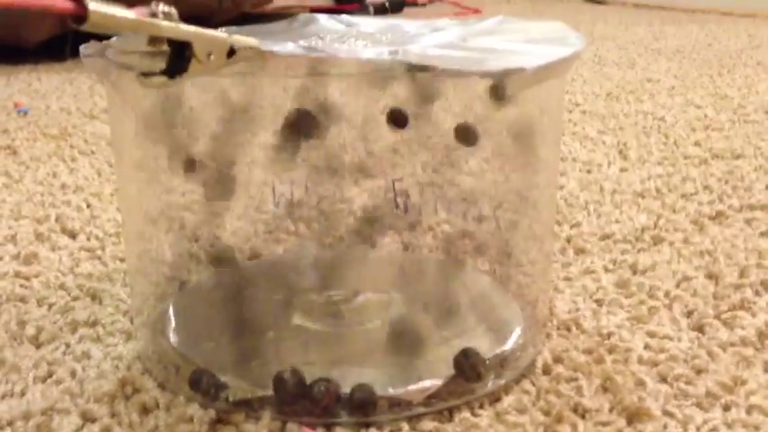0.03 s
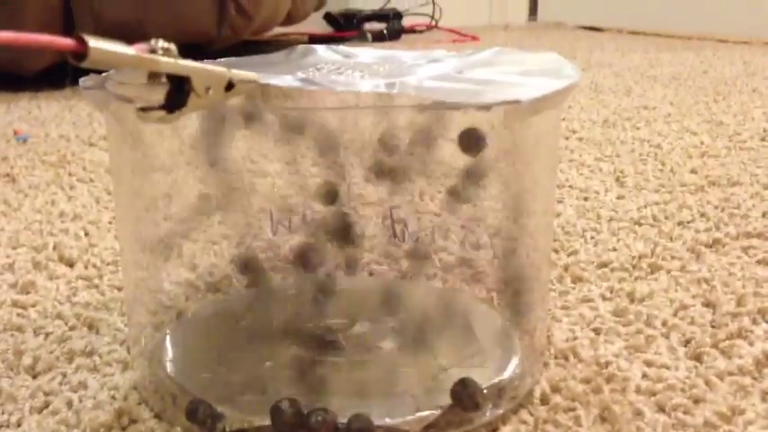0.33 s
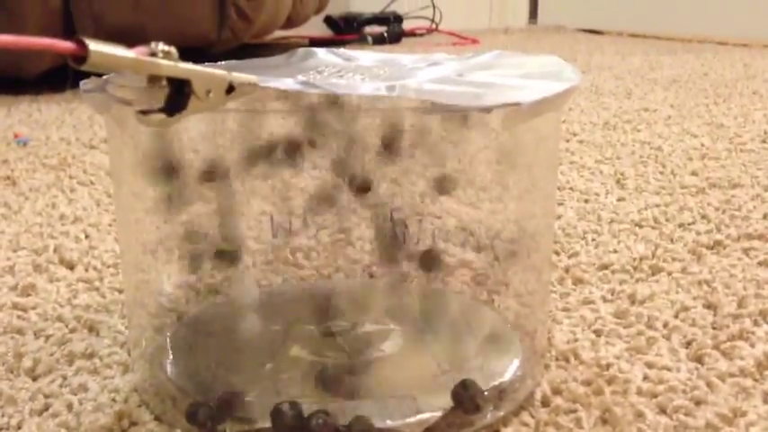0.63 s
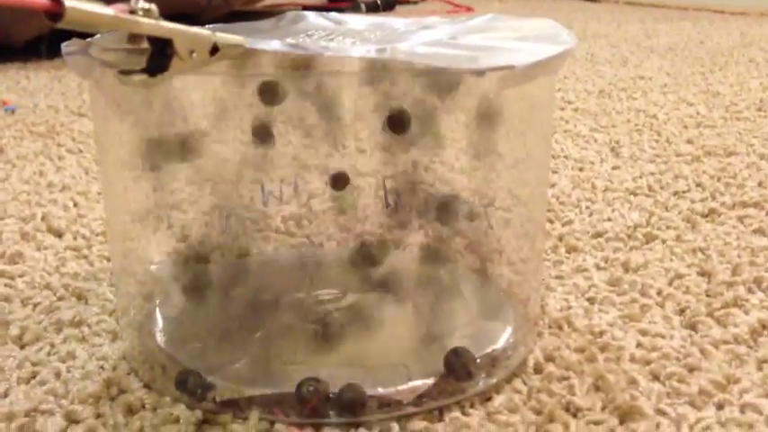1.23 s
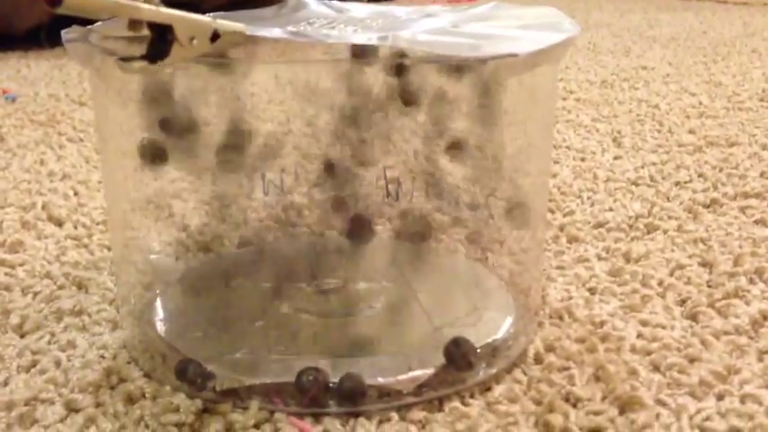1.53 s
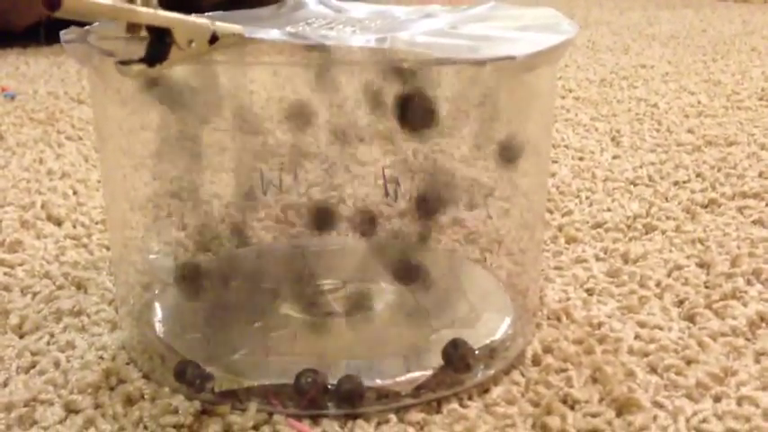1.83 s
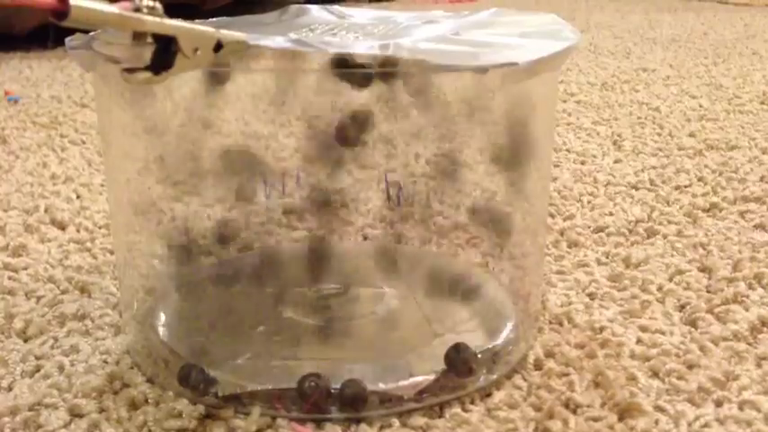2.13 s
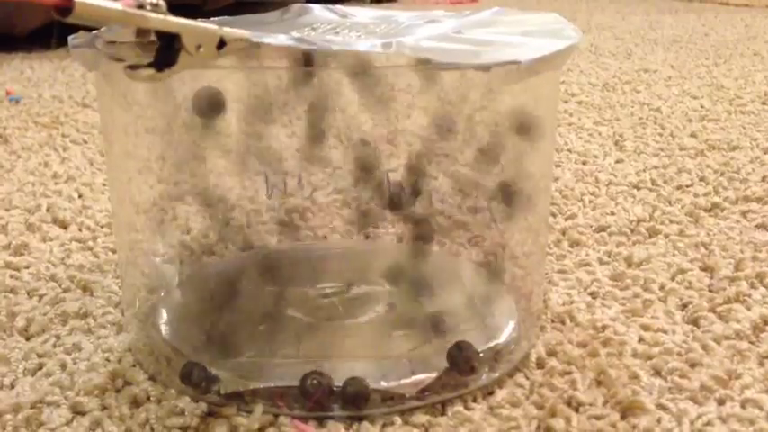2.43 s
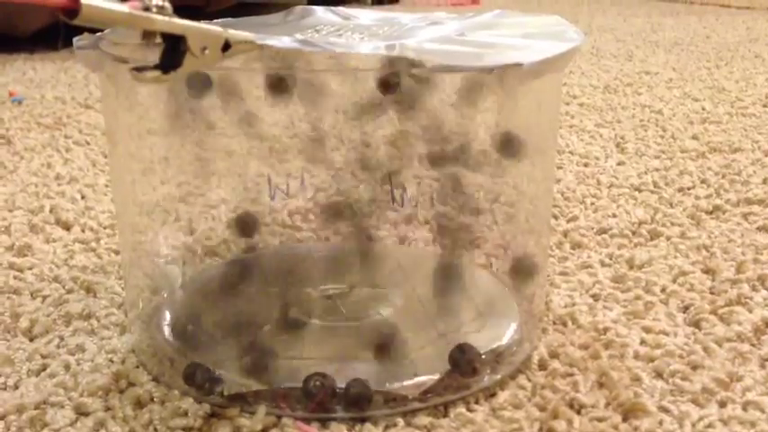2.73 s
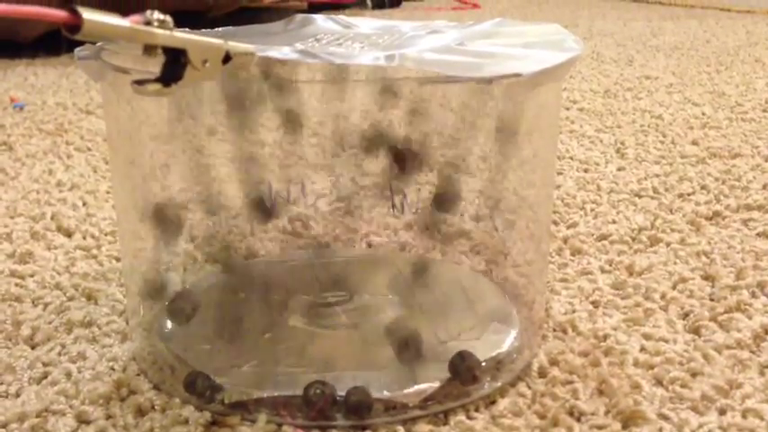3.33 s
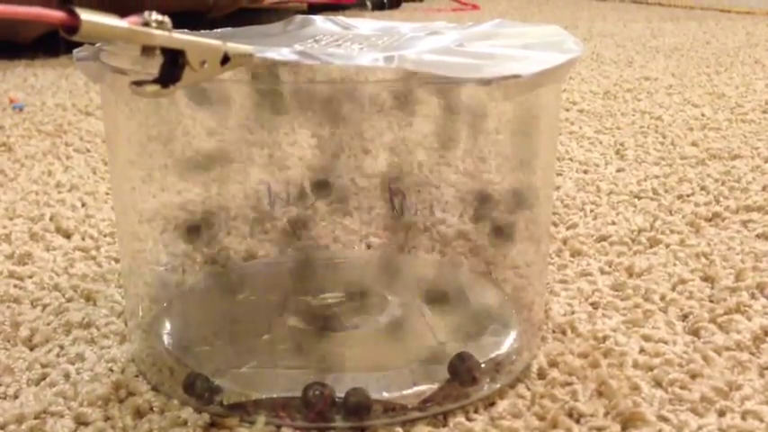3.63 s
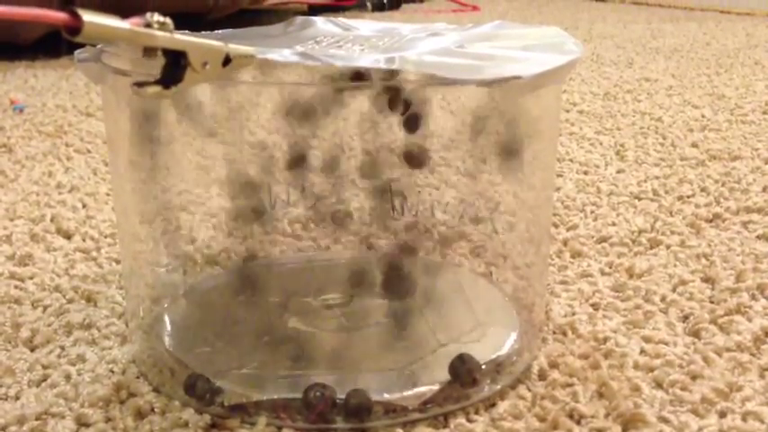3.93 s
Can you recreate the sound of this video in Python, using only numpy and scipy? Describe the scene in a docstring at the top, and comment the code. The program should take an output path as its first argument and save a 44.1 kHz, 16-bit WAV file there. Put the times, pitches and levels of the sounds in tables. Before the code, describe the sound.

Many small foam balls bounce and rattle inside a plastic tub with a foil lid.

```python
"""Dozens of small foam balls bounce between the floor and foil lid of a plastic tub standing on carpet.
Each contact drums on the tub, whose air rings near 600 Hz, rattles its shell and sets the foil crackling.
The swarm slowly loses vigour, with brief dips. A small room answers, over a faint low hum."""
import sys
import numpy as np
from scipy import signal
from scipy.fft import rfft, irfft, next_fast_len
from scipy.io import wavfile

SR = 44100
rng = np.random.default_rng(int(sys.argv[2]) if len(sys.argv) > 2 else 0)


def transcribe(u):
    """Save the signal u as a 16-bit wav file named by the first command-line argument.

    u: samples, shape (n,) or (channels, n), limited to [-1, 1]; the rate is SR.
    q: integer samples, one column per channel.
    """
    v = np.clip(np.atleast_2d(u).T, -1, 1)
    q = np.round(v * 32767).astype(np.int16)
    wavfile.write(sys.argv[1], SR, q)


N = 176400


# hardest drumming contacts: t/s, level/dB
THUMP_HITS = [(0.046, -31), (0.114, -25.5), (0.146, -32), (0.224, -41), (0.243, -28), (0.295, -28.5),
              (0.377, -27.5), (0.408, -35), (0.449, -27), (0.468, -26), (0.484, -27.5), (0.582, -29.5),
              (0.6, -30.5), (0.645, -27.5), (0.674, -28), (0.742, -28), (0.774, -26.5), (0.812, -30),
              (0.84, -31), (0.858, -32), (0.941, -32.5), (1.045, -31.5), (1.121, -29), (1.188, -31),
              (1.213, -28), (1.261, -27.5), (1.282, -30), (1.297, -27), (1.324, -32), (1.357, -27),
              (1.385, -28), (1.441, -28.5), (1.469, -26), (1.492, -32), (1.564, -31), (1.585, -29),
              (1.614, -28), (1.696, -31), (1.741, -29), (1.814, -28), (1.843, -30), (1.883, -29),
              (1.919, -28), (1.953, -32), (2.021, -30), (2.072, -26), (2.247, -32), (2.33, -34),
              (2.367, -27.5), (2.399, -23.5), (2.431, -29), (2.463, -27), (2.536, -30), (2.589, -30),
              (2.839, -31.5), (2.978, -34), (3.054, -27.5), (3.146, -29.5), (3.34, -29), (3.372, -33),
              (3.415, -29), (3.457, -29), (3.525, -33), (3.583, -29), (3.6, -28), (3.623, -26.5),
              (3.692, -26.5), (3.741, -28), (3.857, -32), (3.907, -28.5)]
# broad response of the tub: f/Hz, level/dB
DRUM_SPECTRUM = [(30, -68), (90, -49), (165, -23.5), (290, -16.5), (420, -7.5), (530, -0.5), (660, -3.5),
                 (850, -5.5), (1150, -13), (1600, -14.5), (4000, -46.5)]
# air resonances in the tub: f/Hz, width/Hz, lift/dB
CAVITY_MODES = [(241.3, 13.4, 6), (587, 57, 7.5), (734.6, 25, 9)]
def drumming(vigour, light_db=-44, thump_gain_db=14, flutter_gain_db=-21.5):
    """Contacts push on lid and floor, the lid flutters, and the air in the tub rings."""
    light = amp(light_db) * vigour * taps(rate_hz=170, spread_db=1.5)
    hits = light + amp(thump_gain_db) * pulses(THUMP_HITS)
    flutter = amp(flutter_gain_db) * crackle(hits, decay_s=0.006)
    return convolved(hits + flutter, body(DRUM_SPECTRUM, CAVITY_MODES))


def knocks(centre_hz=602, spread_oct=0.12, rise_s=0.0025, gain_db=-2.5):
    """A hard landing rings hollow, at a pitch set by where the ball meets the lid."""
    t = np.arange(SR // 20) / SR
    envelope = t / rise_s * np.exp(1 - t / rise_s)
    out = np.zeros(N + len(t))
    for (s, db), place in zip(THUMP_HITS, rng.standard_normal(len(THUMP_HITS))):
        hz = centre_hz * 2 ** (spread_oct * place)
        out[int(s * SR):][:len(t)] += amp(db + gain_db) * envelope * np.sin(2 * np.pi * hz * t)
    return out[:N]


def swell(at_s=2.759, width_s=0.0085, hz=596, peak_db=-26):
    """One brief clear note, as contacts fall in step with the tub's ring."""
    t = np.arange(N) / SR - at_s
    return amp(peak_db) * np.exp(-np.abs(t) / width_s) * np.sin(2 * np.pi * hz * t)


HARD_DECAY_S, LIGHT_DECAY_S = 0.0098, 0.0065
# hardest rattling contacts: t/s, level/dB, foil offset/dB
RATTLE_HITS = [(0.037, -33.5, -29), (0.124, -30, -3), (0.141, -30.5, -3.5), (0.242, -31.5, -4),
               (0.274, -30, -6), (0.374, -30.5, -5), (0.469, -29.5, -13), (0.517, -33.5, -7),
               (0.582, -29, -6), (0.638, -32.5, -3.5), (0.703, -29.5, -8), (0.808, -30.5, -8),
               (0.839, -29, -3.5), (0.914, -29.5, -7), (0.95, -34.5, -1.5), (0.995, -28.5, -12),
               (1.042, -30, -6), (1.136, -31.5, -1), (1.168, -33.5, -18), (1.26, -28.5, -10),
               (1.307, -30.5, -14), (1.325, -30, -10), (1.363, -35, -16), (1.385, -33, 0.5),
               (1.429, -33, -3), (1.459, -32, -3), (1.531, -31, -6), (1.56, -31.5, -0.5), (1.661, -33, -10),
               (1.696, -34, -6), (1.738, -33.5, 1.5), (1.807, -35, -10), (1.824, -32.5, -14),
               (1.874, -28.5, -9), (1.903, -33.5, -6), (1.933, -31.5, -5), (2.016, -36, -3),
               (2.065, -31, -8), (2.141, -38, -1), (2.161, -29, -9), (2.222, -31.5, -6.5),
               (2.314, -36.5, -6), (2.35, -30, -21), (2.396, -29.5, -9), (2.462, -30, -8),
               (2.588, -36, -15), (2.84, -38, -6), (2.955, -31, -21), (2.998, -34, -17),
               (3.022, -29.5, -11), (3.084, -35, -2.5), (3.146, -31, -13), (3.197, -33, -12),
               (3.342, -31.5, -17), (3.383, -36, -5), (3.556, -30, -5), (3.605, -34, -12),
               (3.631, -33.5, -5.5), (3.69, -30.5, -20), (3.738, -28, -7.5)]
# broad response of the shell: f/Hz, level/dB
SHELL_SPECTRUM = [(150, -57), (700, -7), (1400, -7.5), (1650, -12), (2000, 1), (3200, 1), (4000, 0),
                  (5000, -9), (6400, -7), (8500, -12), (15000, -22)]
# lid and wall resonances: f/Hz, width/Hz, lift/dB
LID_WALL_MODES = [(1760, 67, 12.2), (2303, 190, 2.55), (2800, 66, 8.1), (3048, 170, 4.34), (3423, 58, 3.1),
                  (3538, 132, 9.4), (3716, 25, 8.1), (4240, 89, 4.2), (4387, 110, 9), (4695, 37, 13.2),
                  (5196, 110, 6), (5400, 76, 3.6), (6340, 87, 6), (7300, 72, 2.7)]
def shell(vigour, light_db=-39, tap_db=-43.5, hard_gain_db=-1):
    """Taps and short rattles ring through the modes of lid and wall."""
    light = amp(light_db) * unit(crackle(swarm(rate_hz=200, spread_db=1), LIGHT_DECAY_S))
    light += amp(tap_db) * taps(rate_hz=150, spread_db=4)
    hits = pulses([(s, db) for s, db, _ in RATTLE_HITS])
    hard = amp(hard_gain_db) * crackle(hits, HARD_DECAY_S)
    return convolved(vigour * light + hard, body(SHELL_SPECTRUM, LID_WALL_MODES))


def pings(vigour, t60_cycles=170, rms_db=-43.5):
    """Where a ball lands on the wall decides which mode rings out; low modes ring longest."""
    t = np.arange(SR // 5) / SR
    out = np.zeros(N)
    for hz, _, lift_db in LID_WALL_MODES:
        ring = np.cos(2 * np.pi * hz * t) * amp(-60 * t * hz / t60_cycles)
        weight_db = lift_db + np.interp(hz, *np.transpose(SHELL_SPECTRUM))
        out += amp(weight_db) * convolved(vigour * taps(rate_hz=18, spread_db=4), ring)
    return amp(rms_db) * unit(out)


# broad response of the foil: f/Hz, level/dB
FOIL_SPECTRUM = [(150, -53), (1500, -17), (3500, 0.5), (5200, -0.5), (6400, 2.5), (7600, 3.5), (8500, -1.5),
                 (10200, -2), (12000, -10), (15000, -14.5)]
def foil(vigour, light_db=-44, hard_gain_db=0.5, snap_db=-49):
    """Balls that reach the lid make the foil crinkle and snap brightly."""
    light = amp(light_db) * unit(crackle(swarm(rate_hz=170, spread_db=3), LIGHT_DECAY_S))
    hits = pulses([(s, db + offset_db) for s, db, offset_db in RATTLE_HITS])
    hard = amp(hard_gain_db) * crackle(hits, HARD_DECAY_S)
    crinkle = convolved(np.sqrt(vigour) * light + hard, body(FOIL_SPECTRUM, LID_WALL_MODES))
    clicks = amp(snap_db) * unit(convolved(snaps(), body(FOIL_SPECTRUM)))
    return crinkle + vigour * clicks


TOP_HZ = 15350
def snaps(rate_hz=400, spread_db=3, centre_hz=6920, spread_oct=0.67, decay_cycles=1.9):
    """Creases of the foil click for a few cycles; rms 1."""
    jitter, size, pitch = rng.standard_normal((4000, 3)).T
    start = ((np.arange(len(jitter)) + jitter) / rate_hz * SR).astype(int)
    keep = (start > 0) & (start < N)
    hz = np.minimum(centre_hz * 2 ** (spread_oct * pitch[keep, None]), TOP_HZ)
    gain = amp(spread_db * np.minimum(size[keep, None], 2))
    n = np.arange(SR // 400)
    cycles = hz * n / SR
    grains = gain * cycles * np.exp(-cycles / decay_cycles) * np.sin(2 * np.pi * cycles)
    return unit(np.bincount((start[keep, None] + n).ravel(), grains.ravel(), N)[:N])


# buckling creases: t/s, level/dB
FOIL_CRACKS = [(.125, -35), (.3655, -29), (1.386, -34), (1.563, -44)]
def cracks(sizzle_db=-53.5, low_cut_hz=5000):
    """The shaken foil sizzles steadily; now and then a crease buckles with a bright crack."""
    highpass = signal.butter(2, low_cut_hz, "highpass", fs=SR, output="sos")
    sizzle = amp(sizzle_db) * rng.standard_normal(N)
    return signal.sosfilt(highpass, sizzle + crackle(pulses(FOIL_CRACKS), decay_s=0.0015))


# single dry contacts: t/s, level/dB, f/Hz
BALL_TICKS = [(.1761, -23, 4000), (1.4445, -21, 3500), (2.5485, -19, 3500)]
def ticks(rise_cycles=0.93):
    """A ball clicks on the wall or lid: a few cycles with no ring."""
    t = np.arange(SR // 100) / SR
    out = np.zeros(N)
    for s, db, hz in BALL_TICKS:
        age = hz * t / rise_cycles
        click = age * np.exp(1 - age) * np.sin(2 * np.pi * hz * t)
        out += convolved(pulses([(s, db)]), click)
    return out


def room(x, t60_s=0.15, delay_s=0.003, gain_db=-10.5):
    """A short diffuse answer from the walls."""
    t = np.arange(SR // 2) / SR
    tail = rng.standard_normal(len(t)) * amp(-60 * t / t60_s) * (t > delay_s)
    return amp(gain_db) * convolved(x, tail / np.linalg.norm(tail))


# mains harmonics: f/Hz, level/dB
HUM_PARTIALS = [(120, -79.5), (240, -73)]
# room air: f/Hz, level/dB
AIR_SPECTRUM = [(20, -45), (80, -17.5), (165, 2), (350, -1), (1200, -17), (12000, -63)]
def background(air_db=-64.5):
    """Mains hum and the quiet air of the room."""
    t = np.arange(N) / SR
    hum = sum(amp(db) * np.sin(2 * np.pi * hz * t) for hz, db in HUM_PARTIALS)
    return hum + amp(air_db) * convolved(rng.standard_normal(N), body(AIR_SPECTRUM))


def swarm(rate_hz, spread_db):
    """Impulses of random size, jittered about a steady rate."""
    jitter, size = rng.standard_normal((4000, 2)).T
    s = (np.arange(len(jitter)) + jitter) / rate_hz
    rows = np.column_stack([s, spread_db * np.minimum(size, 2)])
    return pulses(rows[(s > 0) & (s < N / SR)])


def taps(rate_hz, spread_db):
    """Bare contacts of either sign; rms 1."""
    return unit(swarm(rate_hz, spread_db) * rng.choice([-1, 1], N))


def crackle(hits, decay_s, rise_s=0.00047):
    """Each impulse starts a noise burst; the time constants apply to its energy."""
    t = np.arange(SR // 8) / SR
    energy = convolved(hits ** 2, np.exp(-t / decay_s) * (1 - np.exp(-t / rise_s)))
    return np.sqrt(np.abs(energy)) * rng.standard_normal(N)


def body(spectrum, modes=(), size=8192):
    """Minimum-phase response of energy 1: a broad spectrum with resonances on it."""
    hz = np.fft.rfftfreq(size, 1 / SR)
    f, db = np.transpose(spectrum)
    lift = 1 + sum((amp(lift_db) ** 2 - 1) / (1 + ((hz - mode_hz) / width_hz) ** 2) ** 2
                   for mode_hz, width_hz, lift_db in modes)
    gain = amp(np.interp(np.log(hz + 1), np.log(f), db)) * np.sqrt(np.abs(lift))
    cepstrum = irfft(np.log(gain + 1e-6))
    cepstrum[1:size // 2] *= 2
    cepstrum[size // 2 + 1:] = 0
    response = irfft(np.exp(rfft(cepstrum)))
    return response / np.linalg.norm(response)


def pulses(rows):
    """One impulse per (t/s, level/dB) row."""
    s, db = np.transpose(rows)
    return np.bincount(np.clip(s * SR, 0, N - 1).astype(int), amp(db), N)


def convolved(x, response):
    """x through an impulse response."""
    return signal.fftconvolve(x, response)[:N]


def amp(db):
    """Decibels to gain."""
    return 10 ** (np.asarray(db) / 20)


def unit(x):
    """Scale to rms 1."""
    return x / np.sqrt(np.mean(x ** 2) + 1e-20)


# vigour of the bouncing: t/s, level/dB
SWARM_VIGOUR = [(0, 1), (.55, 0), (1.21, 1), (1.245, -4), (1.28, 3), (1.37, 0.5), (1.415, -4), (1.45, -1.5),
                (1.75, 0), (1.797, -4), (1.82, 0.5), (1.98, -2.5), (2.58, 0), (2.69, -3), (2.76, -1),
                (2.89, -0.5), (2.925, -4.5), (2.96, -0.5), (3.08, -2), (3.115, -7), (3.16, -1), (3.63, -1),
                (4, -3)]
def scene():
    """The tub in its room, mono."""
    vigour = amp(np.interp(np.arange(N) / SR, *np.transpose(SWARM_VIGOUR)))
    tub = drumming(vigour) + knocks() + swell() + shell(vigour) + pings(vigour)
    tub += foil(vigour) + cracks() + ticks()
    return (tub + room(tub) + background())[None]


def record(dry, low_cut_hz=94):
    """Roll off the deep bass and cut everything above TOP_HZ."""
    highpass = signal.butter(2, low_cut_hz, "highpass", fs=SR, output="sos")
    size = next_fast_len(N + SR // 2)
    spectrum = rfft(signal.sosfilt(highpass, dry), size)
    passband = np.fft.rfftfreq(size, 1 / SR) < TOP_HZ
    return irfft(spectrum * passband, size)[:, :N]


dry = scene()
out = record(dry)
transcribe(out)
```